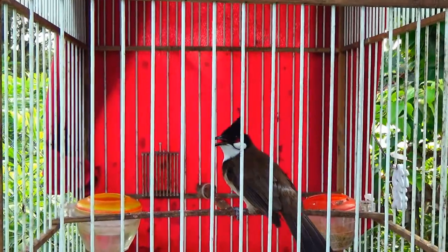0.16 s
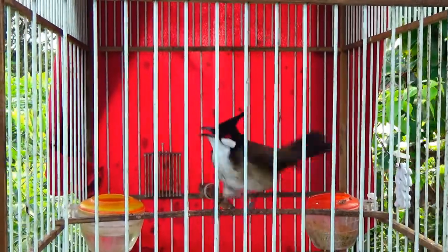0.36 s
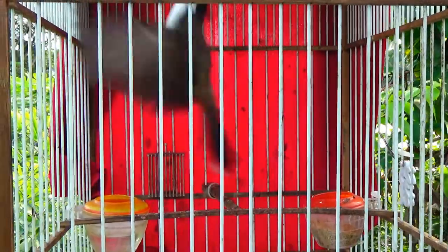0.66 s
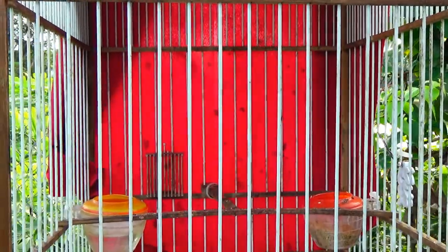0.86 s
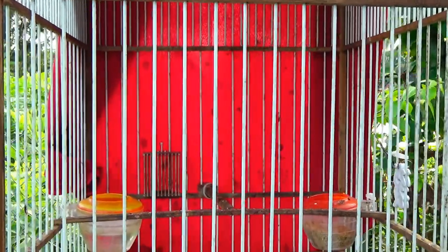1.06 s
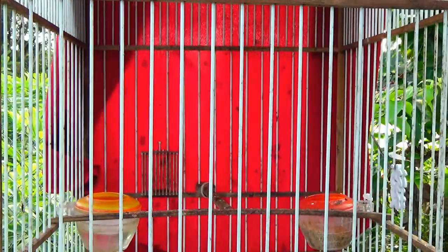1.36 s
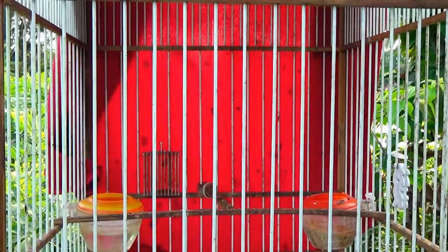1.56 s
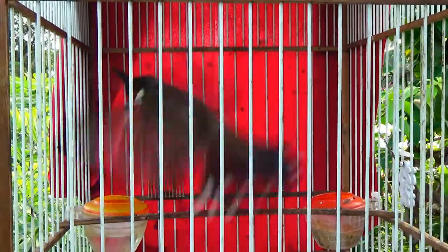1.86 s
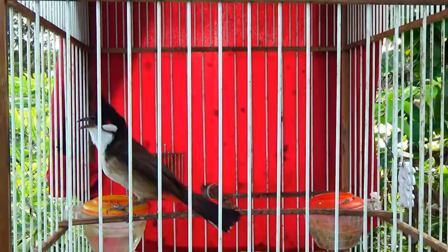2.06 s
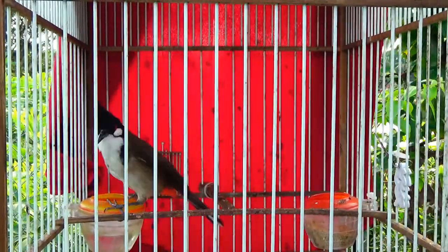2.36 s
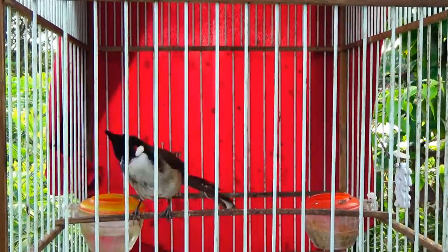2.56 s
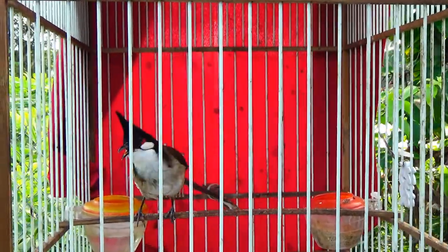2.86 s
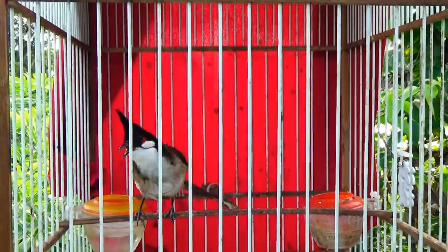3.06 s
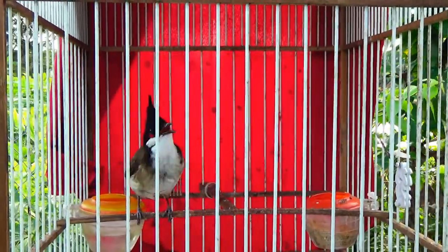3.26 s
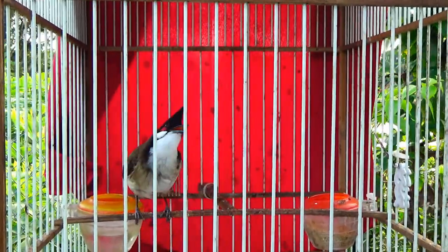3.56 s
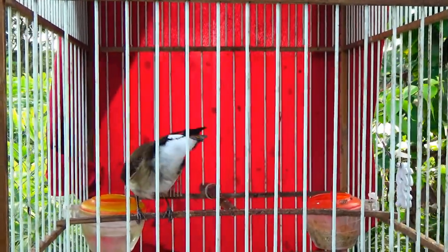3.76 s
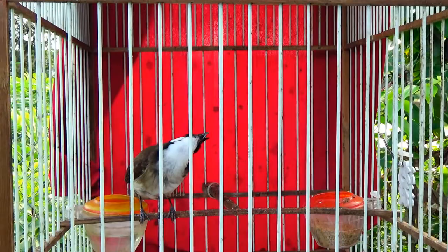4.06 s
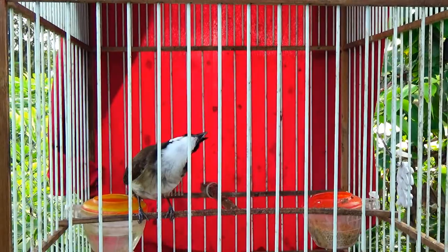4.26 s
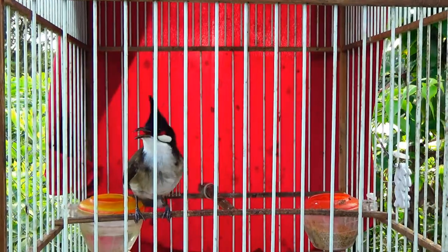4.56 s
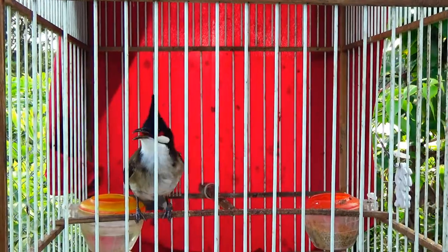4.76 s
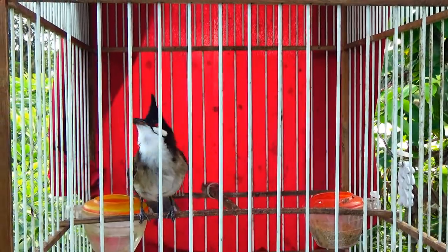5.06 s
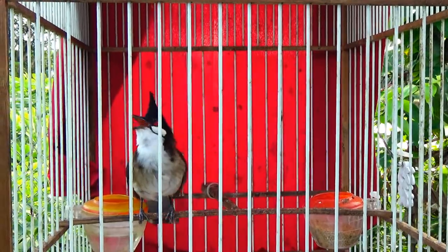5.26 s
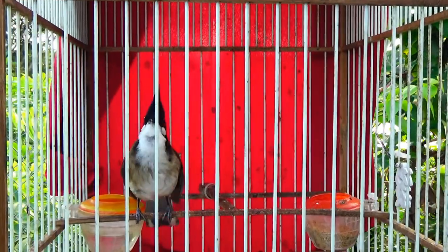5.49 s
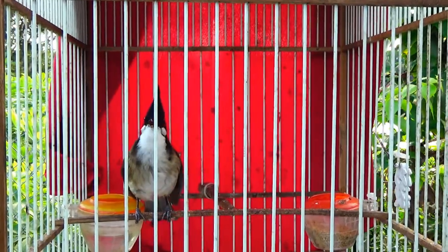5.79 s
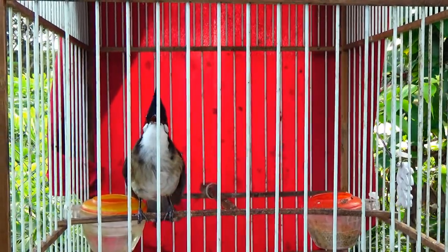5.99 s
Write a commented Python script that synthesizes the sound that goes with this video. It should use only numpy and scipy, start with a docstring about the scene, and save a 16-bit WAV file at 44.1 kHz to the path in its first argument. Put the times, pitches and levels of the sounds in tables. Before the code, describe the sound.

Wing flaps and claw clicks in a small cage, two piercing bursts of four fluttering bird whistles, a faint distant bird, insects and low rumble.

```python
"""Caged songbird in a garden

Close to a phone, a caged bird sings two phrases of four sharp whistles: gliding tones shaken by a fast flutter.
Its wings make puffs of noise and low thumps, its claws tick on ringing bars, and soft decaying tones knock nearby.
A far bird calls before each phrase, heard mostly as echo; insects buzz as narrow noise over leaf hiss and a
dull town rumble. The phone's slow gain control sinks with each phrase; its limiter ducks under the loudest notes."""
import sys
import numpy as np
from scipy import signal
from scipy.fft import rfft, irfft, next_fast_len
from scipy.io import wavfile
from scipy.ndimage import uniform_filter1d, map_coordinates

SR = 44100
rng = np.random.default_rng(int(sys.argv[2]) if len(sys.argv) > 2 else 0)


def output_pcm(signal):
    """Save a mono or channel-first signal as 16-bit PCM at the path in sys.argv[1].

    Samples are clipped to [-1, 1] before scaling.
    """
    pcm = np.clip(np.atleast_2d(signal).T, -1, 1) * 32767
    wavfile.write(sys.argv[1], SR, np.round(pcm).astype(np.int16))


N = 270333  # length [samples]
TOP_HZ = 15800  # upper limit of the phone and of the whistle's overtones

# Note that climbs: (time in note [s], pitch [Hz], level [dB], overtones [dB], flutter depth [1 = full])
RISE = [(0, 2904, -17.5, -10, 1), (.01, 2718, -7, -7.5, 1.2), (.022, 2936, -3, -2.5, 1),
        (0.032, 3230, -4.5, -3, 1.2), (.042, 3640, 0, 5.5, .6), (0.051, 3863, -5, 3, 0.28),
        (.07, 3660, -1.5, -0.5, 0.7)]
# Note that jumps up, same columns: (time [s], pitch [Hz], level [dB], overtones [dB], flutter depth [1 = full])
STEP = [(0, 2146, -22, 9.5, .2), (.005, 2320, -25, 6, .2), (0.012, 2160, -4.5, -1.5, 0.56),
        (0.022, 2272, -9, 3, .1), (0.031, 2035, -17, 6.5, .1), (.034, 2740, -3.5, -3.5, 0.95),
        (.046, 3070, 3, 1.5, .7), (.066, 2980, -9, -10, 0.24)]
# Note that sinks, same columns: (time [s], pitch [Hz], level [dB], overtones [dB], flutter depth [1 = full])
FALL = [(0, 2270, -22, 2, .2), (.012, 2345, -3, -2, .05), (.035, 2378, 0, -2, .03), (.056, 2380, 0, -2, .1),
        (.066, 2150, -10, 4, .4), (.085, 1985, -11, 7, .1), (.11, 1905, -14, 5, .1),
        (.126, 1850, -19, 4, .1)]
# Sung notes; the lean follows the turning head: (time [s], shape, length [s], pitch shift [%],
# level [dB], overtones [dB], left minus right [dB])
NOTES = [(1.9385, RISE, .062, .5, 0.5, -34, .6), (2.0795, RISE, .068, -1.8, 0.5, -38, .4),
         (2.2165, STEP, .066, -.8, 3, -41, .65), (2.341, FALL, .119, -.4, -2, -36, 1.1),
         (5.127, RISE, .059, 1.1, 2.5, -32, .97), (5.266, RISE, .063, -1.6, 3, -32, .5),
         (5.3925, STEP, .068, 1.1, 3, -34, .3), (5.512, FALL, .127, 2.5, 1, -35, .87)]
# Partials of the whistle beside its fundamental: (multiple of the pitch [1], relative level [dB])
PARTIALS = [(.5, -16.5), (1.5, -5.5), (2, 0), (3, -2), (3.5, -22), (4, -4.5), (5, -6.5), (6, -4)]
# Colour the beak gives the overtones: (frequency [Hz], gain [dB])
BEAK_COLOUR = [(1000, -1.5), (11500, 3), (13000, -1.5), (14400, -9), (15500, -19)]
# Echo decay of cage and garden, before scaling: (frequency [Hz], time to fall 60 dB [s])
ECHO_DECAY = [(1900, 0.089), (2400, 0.038), (3000, 0.11), (3700, 0.1), (8000, 0.063)]
# Wing strokes: (time [s], relative rustle level [dB], air push above the rustle [dB])
WING_STROKES = [(0.6414, -30.5, -18), (0.667, -29.5, -7), (0.6828, -23, -6.5), (0.697, -25, -16.5),
                (0.7116, -31, 3), (0.721, -29, -13), (0.7453, -20.5, -9), (0.7644, -32.5, -30),
                (0.787, -27, -4), (0.7978, -21, -25), (0.858, -31.5, -11), (0.879, -35.5, -10.5),
                (1.874, -31.5, -8), (1.894, -20, -1), (1.919, -33.5, -14.5), (1.927, -27.5, -30),
                (2.01, -35.5, -26)]
# Feather rustle spectrum: (frequency [Hz], relative density [dB])
FEATHER_COLOUR = [(350, -50), (600, -22), (798, -11.5), (1690, -7), (2100, -6), (3820, -10), (6400, -4),
                  (15500, -17.5)]
# Feather swish as the bird moves: (start [s], loudest [s], end [s], level [dB])
SWISHES = [(0.326, 0.392, 0.46, -55), (0.591, 0.69, .95, -50), (1.002, 1.022, 1.13, -56.5),
           (1.725, 1.77, 1.815, -52.5), (1.82, 1.945, 2.07, -48.5), (2.46, 2.505, 2.66, -54)]
# Claws on perch and bars: (time [s], peak before the lean [dB], ring time [x bar decay], scrape decay [s])
CLAW_TICKS = [(0.026, -45.5, 0.4, 0.0018), (0.36, -37.5, 0.81, 0.0085), (0.382, -32.5, 0.56, 0.0058),
              (0.389, -25, 0.41, 0.0028), (0.417, -36, 0.35, 0.0063), (0.459, -40, 0.45, 0.0055),
              (1.104, -36, 0.28, 0.0043), (2.484, -31.5, 0.68, 0.0034), (2.49, -11, 0.97, 0.0025),
              (2.5185, -17.5, .4, 0.0036), (2.528, -14.5, 0.99, 0.0046), (2.613, -39.5, 0.75, 0.0092)]
# Ringing modes of the cage bars: (frequency [Hz], relative level [dB], time to fall 60 dB [s])
BAR_MODES = [(5960, -56, 0.023), (6500, -8, 0.043), (6760, 1.5, 0.023), (8750, -6, 0.02),
             (8750, -14, 0.014), (8360, 12, 0.0097), (9980, 7, 0.024), (11350, 4.5, 0.029),
             (13400, -1, 0.054), (13400, -12, 0.015)]
# Low wing thumps (the rows at .669 and .7 s) and soft knocks nearby:
# (time [s], level before onset and lean [dB], pitch [Hz], time to fall 60 dB [s])
LOW_THUMPS_AND_KNOCKS = [(0.669, -25, 140, 0.027), (.7, -35, 55.3, 0.16), (1.604, -35.5, 415, 0.15),
                         (1.608, -43.5, 1254, 0.07), (4.054, -45, 1290, 0.076), (4.565, -37.5, 785, 0.13)]
# Far bird's note that hooks upward: (time in note [s], pitch [Hz], relative level [dB])
HOOK = [(0, 2690, -4), (.018, 3770, 6.5), (0.038, 3770, -15), (.085, 3850, -15)]
# Far bird's arched note: (time in note [s], pitch [Hz], relative level [dB])
ARCH = [(0, 2850, -5.5), (0.026, 3400, -1), (.055, 3381, -8.5), (.1, 2905, -5.5), (.157, 2160, -3)]
# Far bird's notes: (time [s], shape, length [s], level [dB])
FAR_NOTES = [(0.019, HOOK, 0.11, -56), (0.135, ARCH, 0.15, -51.5), (4.53, HOOK, .04, -50),
             (4.627, ARCH, .145, -46.5)]
# Course of the background before its random swells: (time [s], rumble level [dB], leaves level [dB])
BACKGROUND = [(0, -45, -55), (1, -46.5, -55), (1.999, -44.5, -54), (2.9, -45.5, -57), (3.598, -46, -58),
              (4.5, -45.5, -55.5), (5.2, -44, -54.5), (6.13, -49.5, -61)]
# Town rumble spectrum: (frequency [Hz], relative density [dB])
RUMBLE_COLOUR = [(15, -45), (25, -12), (67, 0), (134, 1.5), (192, -7.5), (238, -2.5), (275, -4.5),
                 (573, -9.5), (649, -9), (1800, -22.5), (2340, -50.5), (3960, -120)]
# Stereo lean of the rumble: (frequency [Hz], left minus right [dB])
RUMBLE_LEAN = [(30, 3.5), (100, 1.5), (300, 3), (700, 3.5), (1500, 2)]
# Wavering drones that follow the rumble: (centre [Hz], width [Hz], level at the rumble's first value [dB])
DRONES = [(123.8, 21, -65.5), (219, 47, -59)]
# Leaf hiss spectrum: (frequency [Hz], relative density [dB])
LEAF_COLOUR = [(500, -13), (1200, -8), (2200, -2.5), (3500, -6), (5300, -8.5), (6300, -6.5), (8000, -13),
               (12000, -16), (14500, -20), (16000, -36)]
# Dull rustles among the plants: (time of peak [s], level [dB], bell width [s])
PLANT_RUSTLES = [(3.115, -48, 0.052), (3.458, -58.5, 0.0256), (4.061, -51.5, 0.011), (4.4, -62, 0.017),
                 (4.575, -59, 0.054)]


def amp(db):
    """Decibels to amplitude."""
    return 10 ** (np.asarray(db) / 20)


def unit(x):
    """Scale to rms 1."""
    return x / np.sqrt(np.mean(x ** 2) + 1e-20)


def along(points, hz):
    """Read (Hz, value) points on a log frequency axis."""
    f, v = np.transpose(points)
    return np.interp(np.log(hz + 1), np.log(f + 1), v)


def colour(points):
    """A frequency response drawn through (Hz, dB) points."""
    return lambda hz: amp(along(points, hz))


def band(centre, width):
    """A bell-shaped pass band [Hz]."""
    return lambda hz: np.exp(-.5 * ((hz - centre) / width) ** 2)


def wobble(rate, n):
    """A smooth random curve with rate knots a second."""
    knots = rng.standard_normal(int(n * rate / SR) + 4)
    return map_coordinates(knots, [np.arange(n) * rate / SR])


def filtered(x, response):
    """Multiply the spectrum of x by a response of frequency."""
    m = next_fast_len(x.shape[-1] + 8192)
    return irfft(rfft(x, m) * response(np.fft.rfftfreq(m, 1 / SR)), m)[..., :x.shape[-1]]


def noise(response):
    """Coloured noise of rms 1."""
    return unit(filtered(rng.standard_normal(N), response))


def spread(response, lean, side_db):
    """Nearly mono stereo noise that leans left by lean (Hz, dB)."""
    mid, side = noise(response), amp(side_db) * noise(response)
    halves = np.array([[.5], [-.5]])
    return filtered(np.array([mid + side, mid - side]), lambda hz: amp(along(lean, hz) * halves))


def add(track, s, sound):
    """Mix a sound in at time s."""
    part = track[round(s * SR):][:len(sound)]
    part += sound[:len(part)]


def syllable(shape, length, edge):
    """Times since the start, a gate with soft edges, and the shape's columns sample by sample."""
    s, *cols = np.transpose(shape)
    t = np.arange(int(length * SR)) / SR
    gate = np.clip(np.minimum(t, t[-1] - t) / edge, 0, 1)
    return t, gate, [np.interp(t, s, c) for c in cols]


def tail(length, slower):
    """A scattered stereo echo tail in which each frequency dies at its own speed."""
    hz, t, z = signal.stft(rng.standard_normal((2, int(length * SR))), SR, nperseg=128)
    t60 = slower * along(ECHO_DECAY, hz)[:, None]
    mid, side = signal.istft(z * amp(-60 * t / t60), SR, nperseg=128)[1]
    ears = mid + 0.11 * side * np.array([[1], [-1]])
    return ears / np.linalg.norm(ears[0])  # energy 1 in the left ear


def echoed(track, s, sound, near_db, far_db):
    """Add the echo of cage and garden, scattered anew for each sound as the bird moves."""
    for db, delay, slower in ((near_db, .003, .9), (far_db, .02, 3.5)):
        wet = signal.fftconvolve(sound[None], tail(.4, slower), axes=1)
        add(track.T, s + delay, amp(db) * wet.T)


def song():
    """A whistle with weak overtones; an uneven flutter of the voice organ shakes pitch and level together."""
    flutter_hz, flutter_start = 157, .79  # mean rate [Hz]; same starting point in every note [cycles]
    release_s, release_db = 0.0047, -4.5  # every note fades over its last moment
    out = np.zeros((2, N))
    for s, shape, length, shift, note_db, thin_db, lean_db in NOTES:
        t, gate, (hz, db, over_db, depth) = syllable(shape, length, edge=.0025)
        n = len(t)
        hz = hz * (1 + shift / 100)
        db = db + release_db * np.clip(1 - (length - t) / release_s, 0, 1)

        cycles = np.cumsum(flutter_hz * (1 + .08 * wobble(90, n))) / SR
        flutter = np.sin(2 * np.pi * (cycles + flutter_start))
        swing = depth * (1 + .3 * wobble(120, n))
        shaken_hz = hz * (1 + 0.05 * swing * flutter + 0.007 * wobble(500, n))
        phase = 2 * np.pi * np.cumsum(shaken_hz) / SR
        dip_db = -4.5 * np.abs(swing) * (.5 - .5 * flutter) ** 3  # short notch where the flutter is lowest

        high = np.clip((hz - 2550) / 500, 0, 1)  # the high register loses half-way and upper partials
        overtones = np.zeros(n)
        for k, level in PARTIALS:
            loss_db = 10 * high * (k not in (2, 3))
            partial_db = level - loss_db + along(BEAK_COLOUR, k * hz) + 2.35 * wobble(179, n)
            overtones += amp(partial_db) * np.sin(k * phase) * (k * hz < TOP_HZ)

        breath = amp(-38) * filtered(rng.standard_normal(n), band(8000, 4200))  # air hiss through the beak
        voice = np.sin(phase) + amp(thin_db + over_db) * overtones + breath
        note = np.sqrt(2) * gate * amp(note_db + db + dip_db) * voice
        add(out.T, s, note[:, None] * amp([lean_db / 2, -lean_db / 2]))
        echoed(out, s, note, near_db=-16.5, far_db=-34.5)
    return out


def wings():
    """Each stroke is a crackly feather puff over a low push of air; softer swishes accompany movement."""
    stroke_s, edge_db = 0.013, -2  # stroke time scale; swish level at start and end under the loudest
    rustle, push, swish = np.zeros((3, N))
    u = np.arange(int(.1 * SR)) / SR / stroke_s  # time in strokes
    for s, db, low_db in WING_STROKES:
        add(rustle, s, amp(db - 5) * np.minimum(3 * u, 1) * np.exp(-1.6 * u))
        add(push, s - .004, amp(db + low_db - 10.5) * np.exp(-(u / 0.76 - .9) ** 2))
    for start, top, end, level_db in SWISHES:
        shape = [(0, edge_db), (top - start, 0), (end - start, edge_db)]
        t, gate, (db,) = syllable(shape, end - start, edge=0.024)
        add(swish, start, gate * amp(level_db + db + 4.5 * wobble(45, len(t))))
    feathers = unit(amp(1.13 * wobble(700, N)) * noise(colour(FEATHER_COLOUR)))
    soft_colour = colour([(1500, -16.5), (4000, -13), (6400, -5), (11000, -10), (15500, -14.5)])
    soft = spread(soft_colour, [(1, .3)], side_db=-29.5)
    air = noise(colour([(20, -18), (50, 5.5), (130, -5), (400, -3.0), (1500, -17), (4000, -47)]))
    return rustle * feathers + swish * soft + push * air * amp([[.7], [-.7]])


def claws():
    """Each contact is a brief thin scratch that rings the bars at new strengths and slightly new pitches."""
    out, t = np.zeros(N), np.arange(int(.06 * SR)) / SR
    thin = signal.butter(5, [5300, 15200], "bandpass", fs=SR, output="sos")
    for s, db, ring, scrape in CLAW_TICKS:
        bars = np.zeros(len(t))
        for hz, level, t60 in BAR_MODES:
            decay = amp(level + rng.normal(0, 1.4) - 60 * t / (t60 * ring))
            bars += decay * np.sin(2 * np.pi * hz * (1 + rng.normal(0, 0.021)) * t)
        uneven = amp(3 * wobble(900, len(t)))
        grit = rng.standard_normal(len(t)) * uneven * np.exp(-t / scrape)
        tick = unit(signal.fftconvolve(bars, grit)[:len(t)]) + 1.3 * unit(grit)
        tick = signal.sosfilt(thin, tick)
        add(out, s, amp(db) * tick / np.abs(tick).max())
    return out * amp([[.6], [-.6]])


def thumps_and_knocks():
    """Short low thumps and hollow taps: decaying tones with a soft start."""
    out, t = np.zeros(N), np.arange(int(.15 * SR)) / SR
    for s, db, hz, t60 in LOW_THUMPS_AND_KNOCKS:
        onset = 1 - np.exp(-t / 0.0011)
        add(out, s, amp(db - 60 * t / t60) * onset * np.sin(2 * np.pi * hz * t))
    return out * amp([[1.2], [-1.2]])


def far_bird():
    """The far bird's unsteady whistle arrives mostly as echo."""
    out = np.zeros((2, N))
    for s, shape, length, note_db in FAR_NOTES:
        t, gate, (hz, db) = syllable(shape, length, edge=0.00185)
        level = gate * amp(note_db + db + 4 * wobble(130, len(t)))
        phase = 2 * np.pi * np.cumsum(hz * (1 + .03 * wobble(220, len(t)))) / SR
        note = level * np.sin(phase)
        add(out.T, s, note[:, None] * [1, 1])
        echoed(out, s, note, near_db=1, far_db=0.5)
    return out


def insects(t):
    """Two insect choirs as narrow noise bands that throb; the lower, thinner one weakens late."""
    choir_db = -57.5 + 0.29 * wobble(2.7, N) + 0.69 * wobble(45, N)
    choir = amp(choir_db) * spread(band(4752, 130), [(1, .3)], side_db=-31)
    drop_db = -3.5 * np.clip((t - 3.74) / .15 + .5, 0, 1)  # over .15 s around 3.74 s
    thin_db = -66.5 + drop_db + 0.83 * wobble(8.4, N)
    return choir + amp(thin_db) * spread(band(2360, 14), [(1, -.5)], side_db=-19.5)


def plants(t, leaves_db):
    """Leaf hiss that drifts in level, and a few dull rustles under bell-shaped swells."""
    level = amp(leaves_db + 0.66 * wobble(1.6, N))
    hiss = level * spread(colour(LEAF_COLOUR), [(1, .1)], side_db=-22.5)
    stir = sum(amp(db) * np.exp(-.5 * ((t - s) / width) ** 2) for s, db, width in PLANT_RUSTLES)
    dull = colour([(300, -6.0), (900, 1.5), (2600, -7), (3600, -14), (8000, -45.0)])
    return hiss + stir * amp(2.5 * wobble(60, N)) * spread(dull, [(1, 1.3)], side_db=-22.5)


def rumble(rumble_db):
    """Patchy low noise leaning left, with wavering drones as narrow bands inside it."""
    swell_db = 1.4 * wobble(4, N) + 1.2 * wobble(11, N)
    out = amp(rumble_db + swell_db) * spread(colour(RUMBLE_COLOUR), RUMBLE_LEAN, side_db=-25)
    for centre, width, db in DRONES:
        drone_db = rumble_db - BACKGROUND[0][1] + db + 1.04 * wobble(1.3, N)
        out += amp(drone_db) * spread(band(centre, width), RUMBLE_LEAN, side_db=-32.0)
    return out


def garden():
    """The background: insects, plants and town rumble."""
    t = np.arange(N) / SR
    s, *cols = np.transpose(BACKGROUND)
    rumble_db, leaves_db = (np.interp(t, s, c) for c in cols)
    return insects(t) + plants(t, leaves_db) + rumble(rumble_db)


def scene():
    """All sources together, from the close bird to the background."""
    return song() + wings() + claws() + thumps_and_knocks() + far_bird() + garden()


def record(dry):
    """The phone: slow gain control, then a fast limiter, then the band limit."""
    t = np.arange(N) / SR
    keep = np.exp(-1 / (.45 * SR))  # the power average forgets with a .45 s time constant
    memory = signal.lfilter([1 - keep], [1, -keep], np.mean(dry ** 2, axis=0))
    held = dry * (1 + memory / amp(2 * -19)) ** -.25  # knee at a mean power of -19 dB

    peak_db = 20 * np.log10(np.abs(held).max(axis=0) + 1e-9)
    release_db = 330 * t  # the level reading jumps up at once and falls at 330 dB/s
    peak_db = np.maximum.accumulate(peak_db + release_db) - release_db
    cut_db = uniform_filter1d(.92 * np.maximum(peak_db + 10.5, 0), size=151)  # threshold -10.5 dB
    return filtered(held * amp(-cut_db), lambda hz: hz < TOP_HZ)


dry = scene()
out = record(dry)
output_pcm(out)
```